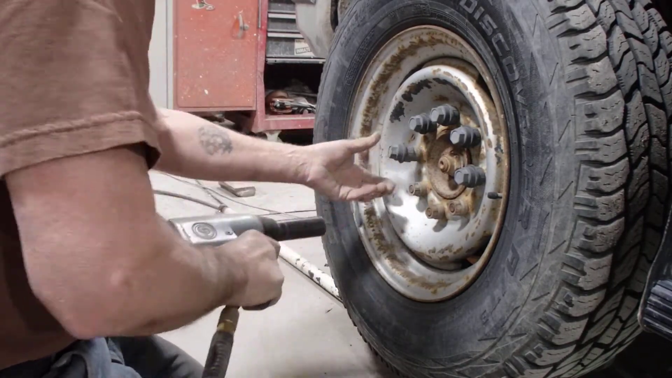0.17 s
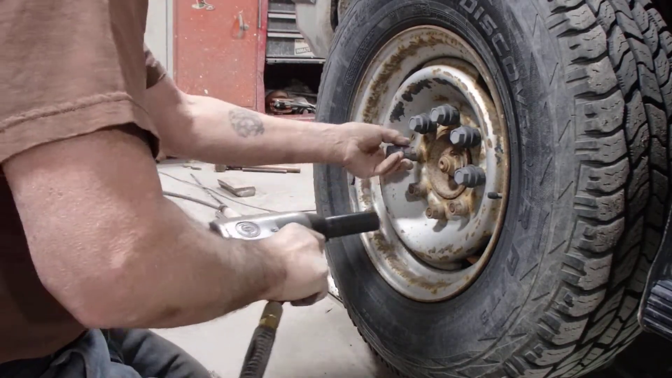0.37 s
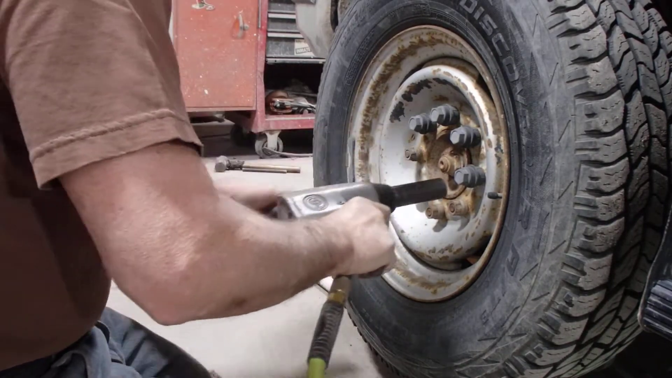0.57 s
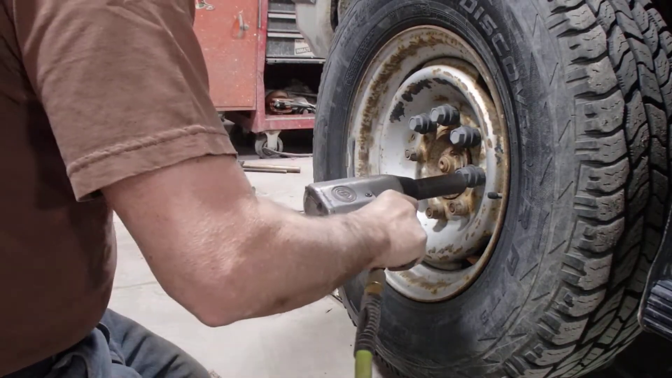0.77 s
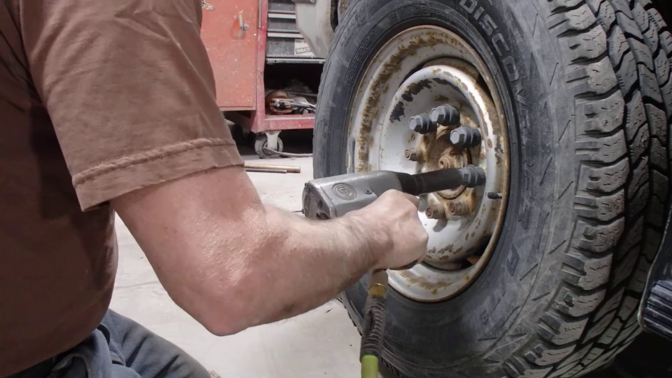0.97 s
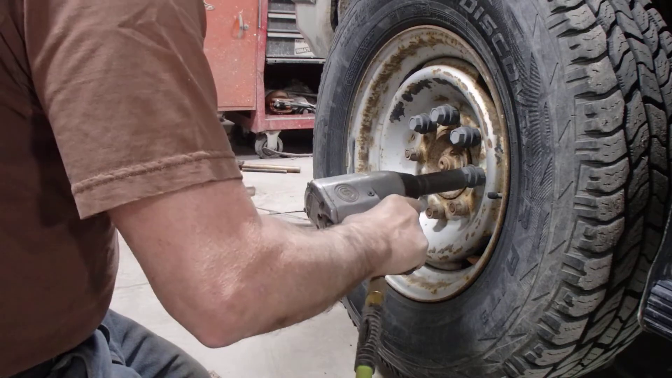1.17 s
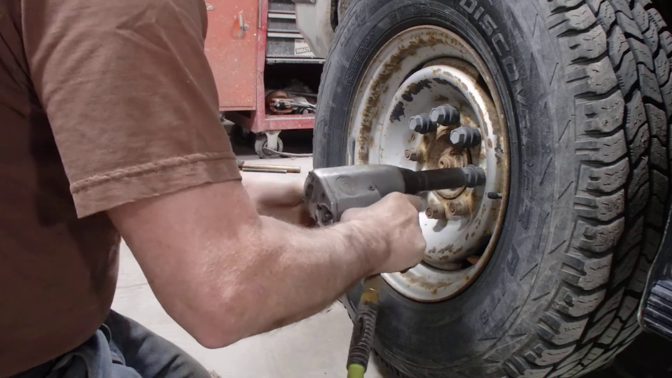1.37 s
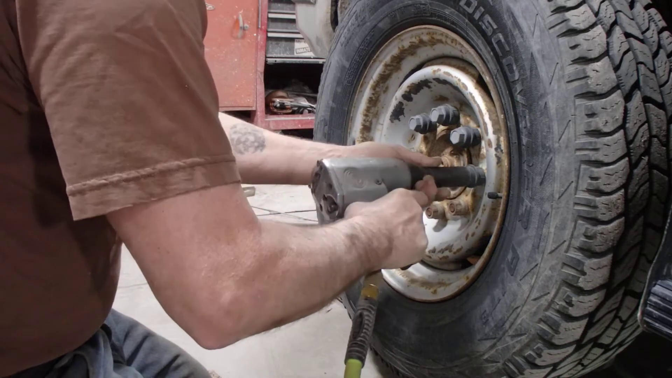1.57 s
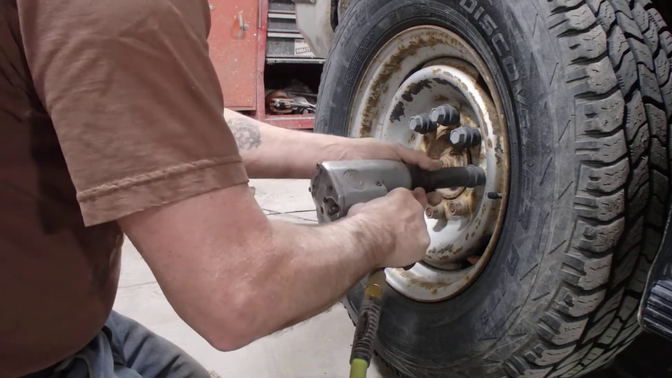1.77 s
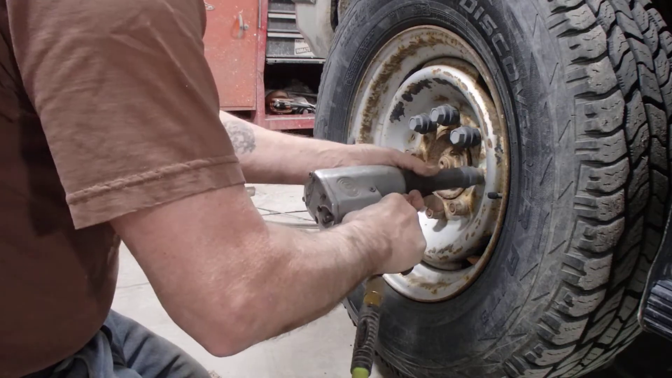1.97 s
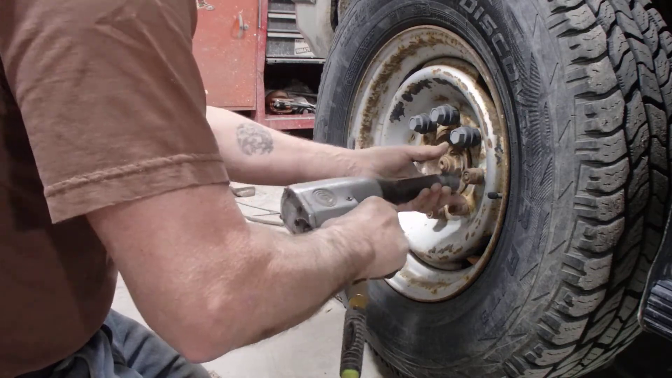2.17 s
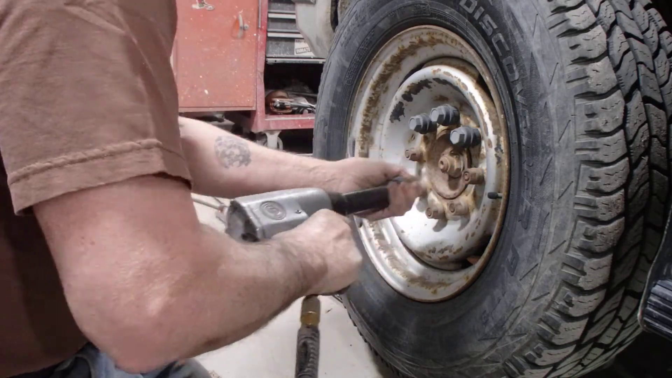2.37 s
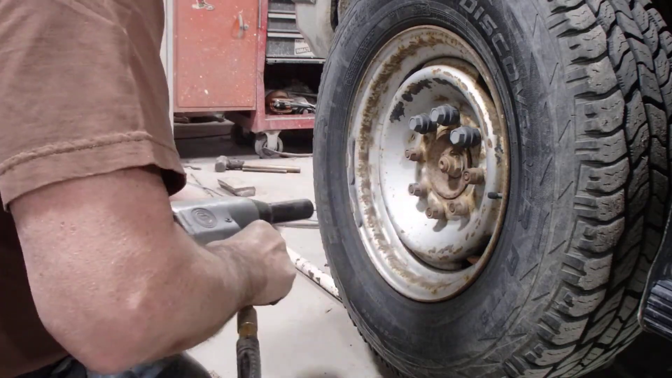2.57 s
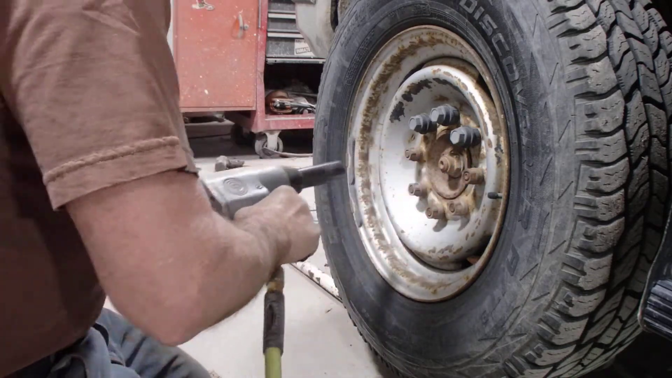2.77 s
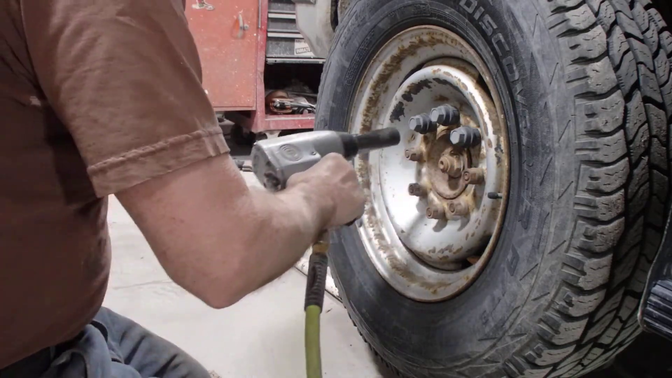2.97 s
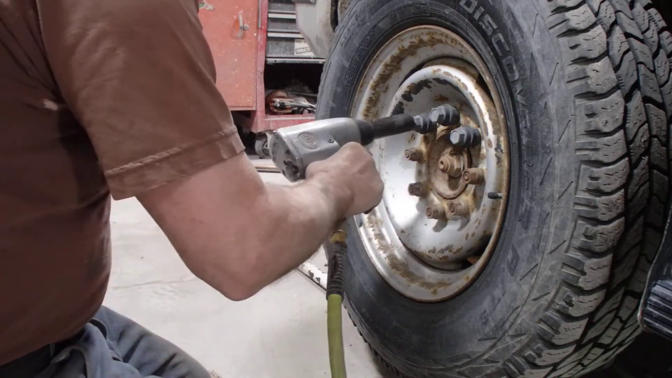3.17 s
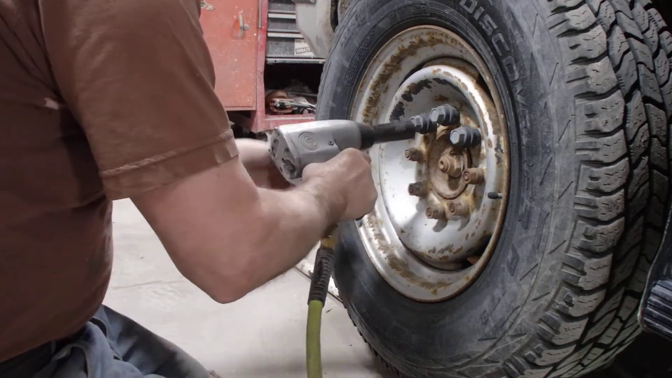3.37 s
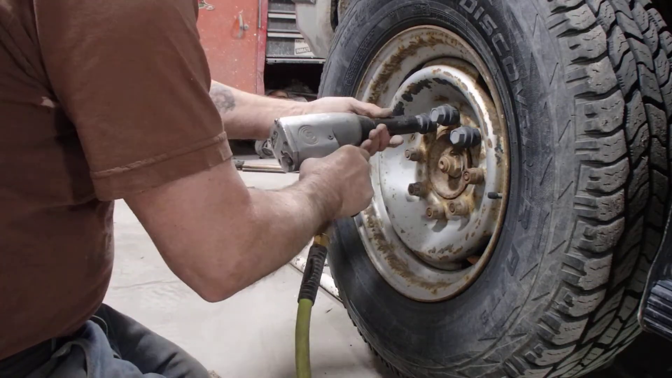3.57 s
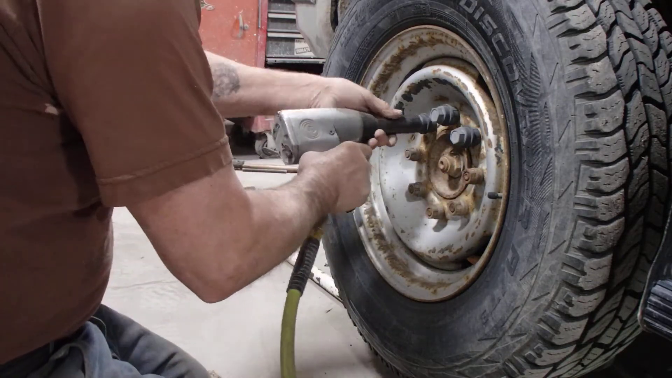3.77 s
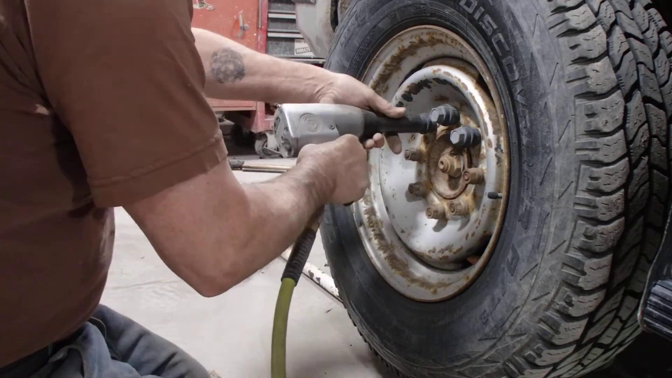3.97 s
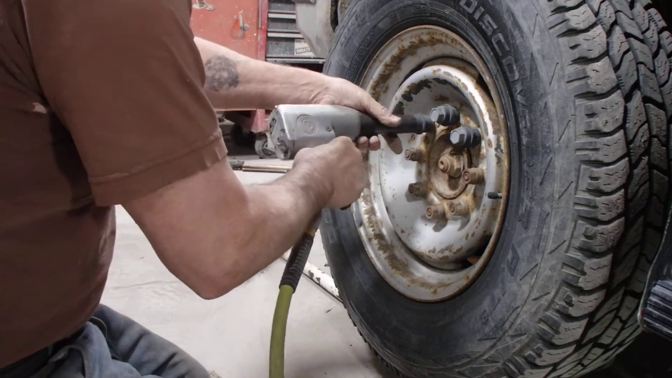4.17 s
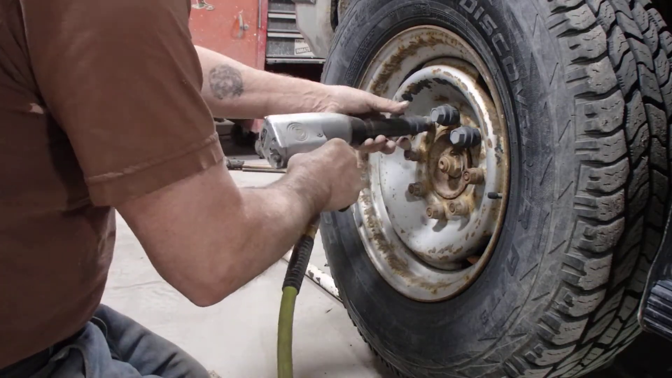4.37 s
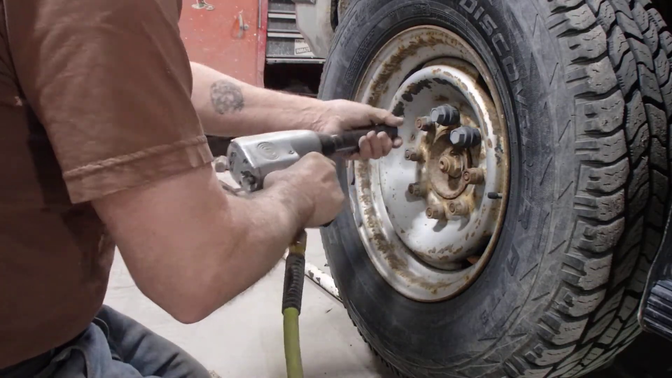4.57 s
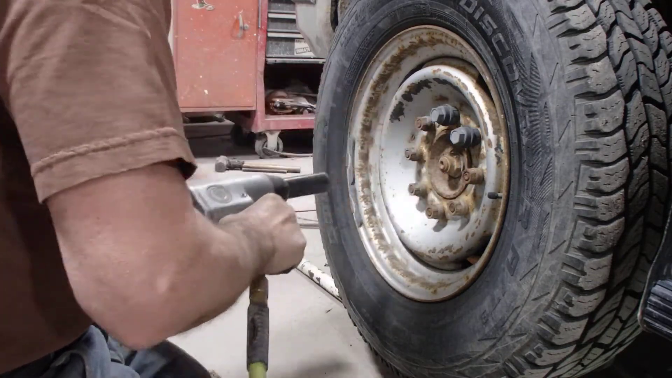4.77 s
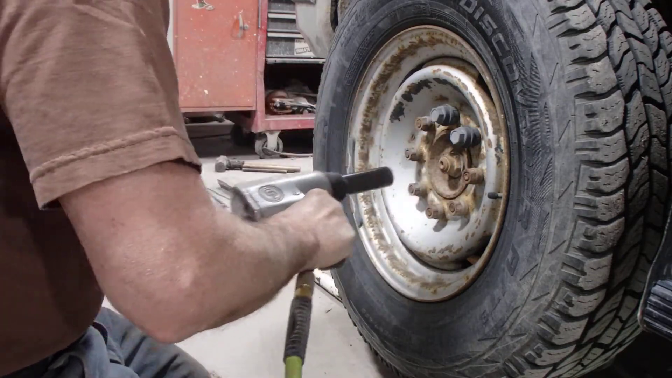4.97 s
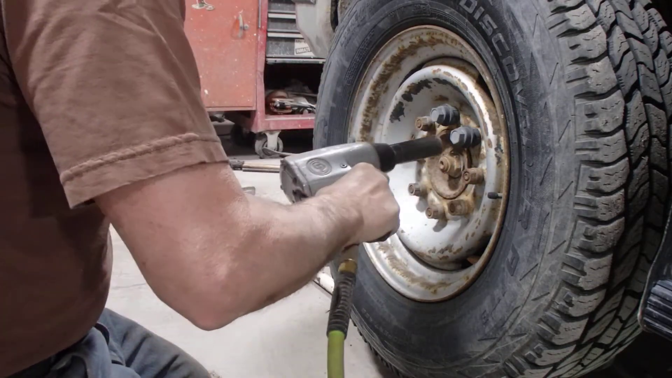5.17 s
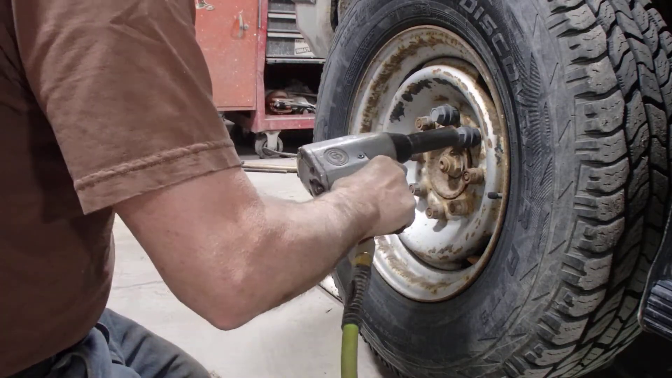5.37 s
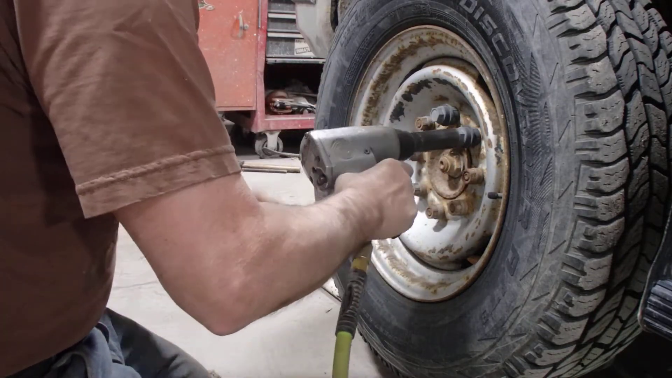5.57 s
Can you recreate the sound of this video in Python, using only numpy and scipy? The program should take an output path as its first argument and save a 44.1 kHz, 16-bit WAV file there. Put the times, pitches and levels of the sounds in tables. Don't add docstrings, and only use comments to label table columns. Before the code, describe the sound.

An air impact wrench fires two short hammering bursts in a garage, with metallic socket clinks and rattles between them.

```python
import sys
import numpy as np
from scipy import signal
from scipy.fft import rfft, irfft
from scipy.io import wavfile
from scipy.ndimage import map_coordinates

SR = 44100
rng = np.random.default_rng(int(sys.argv[2]) if len(sys.argv) > 2 else 0)


def materialize(psi):
    bounded = np.clip(np.atleast_2d(psi).T, -1, 1)
    quanta = np.round(bounded * 32767).astype(np.int16)
    wavfile.write(sys.argv[1], SR, quanta)


def ratio_of_db(decibels):
    return 10 ** (np.asarray(decibels, float) / 20)


N = 247401

# frequency in Hz, level in dB.
SHOP_SPECTRUM = [(25, -22), (60, -13), (100, 2), (250, -1), (365, 5.5), (480, -0.5), (1000, -3), (2000, -9),
                 (4000, -10), (8000, -19.5), (16000, -22.5)]
# duck in seconds, start of recovery in seconds, ducked gain in dB.
GAIN_DUCKS = [
    (-.5, .45, -20),
    (1.95, 2.55, -20.5),
    (4.17, 4.85, -24),
]
# low edge in Hz, high edge in Hz, level in dB, decay by 60 dB in seconds.
OLD_ECHO = [
    (110, 2200, -48, .7),
    (5600, 12000, -40, .45),
]
# low edge in Hz, high edge in Hz, decay by 60 dB in seconds, level in dB.
ROOM_BANDS = [
    (196, 1150, .9, -6.5),
    (1150, 2500, 0.68, -2),
    (2800, 5600, 0.61, -2.5),
    (6030, 20900, .42, -1.5),
]
# time in seconds, level in dB.
LEAK_LEVEL = [(.62, -91), (.68, -83), (.95, -85), (1.0, -95)]
# start in seconds, peak in dB, pitch in Hz.
LOOSE_TICKS = [(0.5594, -56.5, 6870), (0.9138, -55, 8580), (0.9494, -58, 7330), (1.4494, -53.5, 8270),
               (1.4694, -55.5, 8310), (2.7594, -61.5, 10040), (5.1894, -70.5, 9570)]
# start in
# seconds, peak in dB, tube ring in Hz, ring level in dB relative to the hit, treble level in dB relative to the
CLINKS = [(1.258, -17, 1830, -6, -18.5), (1.2806, -14, 1850, -10.5, -21), (1.296, -19, 1900, -12, -20),
          (1.6416, -21.5, 2402, -24, -21), (1.6894, -38.5, 1820, -10.5, -21.5),
          (1.728, -42.5, 2037, -16, -23.5), (3.27, -17, 2300, -1, -23), (3.286, -32, 2250, -2, -12),
          (3.3893, -26.5, 2494, -11.5, -24), (3.4114, -38, 2230, 0, -21.5),
          (3.4377, -26.5, 1828, -5.5, -20.5), (3.5558, -32, 2175, 5, -14), (3.6099, -23.5, 2243, -6.5, -37),
          (3.6428, -44.5, 2180, 3, -11), (3.6703, -22, 2500, -21.5, -21.5), (3.688, -37, 2063, -6, -9.5),
          (3.7065, -32.5, 2100, -14.5, -24.5), (3.7855, -12, 2160, -7.5, -23.5),
          (3.8644, -29, 2218, -3.5, -18.5), (3.909, -21.5, 2185, -6.5, -26),
          (3.9455, -38, 2200, -12.5, -3.5), (3.9982, -29, 1905, -8, -31.5), (5.4715, -25, 1900, 1, -14),
          (5.5733, -39, 2097, 9, -15)]
# frequency in Hz, relative half width, level in dB, fall in seconds.
SOCKET_WALL = [
    (6880, 0.065, -5, .005),
    (10600, 0.065, 2.5, .005),
]
# start in seconds, peak in dB, treble level in dB relative to the peak.
BLOWS = [(0.051, -32, -10.5), (0.1583, -43, -18), (1.9521, -2.5, -21.5), (1.9872, -0.5, -23),
         (2.0273, -2.5, -17), (2.0708, -3, -14.5), (2.1109, -8.5, -18), (2.156, -6.5, -14.5),
         (2.2129, -1.5, -17.5), (2.2972, -11.5, -21), (2.4085, -21.5, -11), (2.4738, -32, -10.5),
         (2.5884, -42, -22), (4.1994, -0.5, -18.5), (4.2346, -4, -14.5), (4.276, -1, -20.5),
         (4.3192, -9, -17), (4.3514, -12.5, -20.5), (4.3991, -9, -19.5), (4.4531, -7, -20),
         (4.5119, -6, -22), (4.6054, -23, -13), (4.6983, -26, -13), (4.7571, -37.5, -7.5)]
# start in seconds, rise in seconds, length in seconds, level in dB, spurts per second.
VALVE_BLASTS = [
    (1.91, 0.0081, 0.047, -5, 300),
    (4.158, 0.013, 0.017, -5, 500),
    (4.174, 0.0093, .023, -2.5, 600),
]
# frequency in Hz, level in dB.
JET_SPECTRUM = [(60, -33.5), (200, -15), (400, -21), (1000, -24.5), (2500, -12.5), (3500, -6), (4600, -5),
                (5800, -5.5), (9600, -6.5), (12000, -14), (16000, -20)]
# stall in seconds, exhaust in dB with the trigger held, exhaust in dB coasting, whine in dB.
BURSTS = [
    (-.02, -25, -39, -44),
    (2.48, -22, -45, -36),
    (4.64, -32, -44, -41),
]
# pressed in seconds, released in seconds.
TRIGGER = [
    (-.5, -.2),
    (1.912, 2.225),
    (4.16, 4.5),
]
# time in seconds, vane rate in Hz.
VANE_RATE = [
    [(-.3, 480), (-.2, 480)],
    [(1.92, 192), (2.0, 276), (2.046, 346), (2.108, 375), (2.15, 400), (2.208, 542), (2.235, 481),
     (2.274, 387)],
    [(4.17, 190), (4.268, 321), (4.32, 352), (4.358, 364), (4.444, 517), (4.488, 497), (4.524, 398),
     (4.576, 344)],
]
# multiple of the vane rate, level in dB.
WHINE_HARMONICS = [(1, 3), (2, 0), (3, 1), (4, -3), (5, -5), (6, -7.5), (7, -3)]
# frequency in Hz, level in dB.
EXHAUST_SPECTRUM = [(100, -35.5), (250, -20.5), (400, -14.5), (1000, -8.5), (1500, -8), (2000, -5),
                    (4000, 3), (8000, 0), (16000, -7.5)]
# frequency in Hz, gain in dB.
MUFFLER = [(100, -8.5), (290, -9), (370, 2.5), (480, -5.5), (800, 3), (1100, 0), (1500, 6.5), (2000, -1),
           (4000, -8)]
# frequency in Hz, gain in dB.
PORT_BASS = [(20, -12.5), (100, -1.5), (365, 5), (600, -0.5), (2000, 1.5), (3900, 6.5), (4600, 4)]
PORT_LEFT = [(5150, -13), (5700, 2), (8000, -7), (9700, 0.5), (11500, -14), (15500, -24)]
PORT_RIGHT = [(5200, -7), (5900, -19), (6800, -13), (8800, -21.5), (10000, -18), (13000, -12), (15500, -21)]
# frequency in Hz, lead of the right port in radians.
PORT_PHASE = [(8500, 0), (10500, 2.5), (14000, 3), (15500, -2)]
# frequency in Hz, level in dB.
SELF_NOISE = [(20, 1.5), (50, 9), (90, 5.5), (150, 4), (500, -3), (16000, 2)]


def curve(table, x):
    return np.interp(x, *np.transpose(table))


def colour(x, table):
    hz, db = np.transpose(table)
    grid_hz = np.linspace(1, SR / 2, 2049)
    gain_db = np.interp(np.log(grid_hz), np.log(hz), db)
    cepstrum = irfft(np.log(ratio_of_db(gain_db)))
    cepstrum[1:2048] *= 2
    cepstrum[2049:] = 0
    impulse = irfft(np.exp(rfft(cepstrum)))
    return signal.fftconvolve(x, impulse)[:len(x)]


def band(x, lo_hz, hi_hz):
    edges = [lo_hz, min(hi_hz, .45 * SR)]
    return signal.sosfilt(signal.butter(2, edges, "band", fs=SR, output="sos"), x)


def unit(x):
    return x / np.sqrt(np.mean(x ** 2))


def noise():
    return rng.standard_normal(N)


def walk(rate):
    levels = rng.standard_normal(N // 30)
    return unit(map_coordinates(levels, [np.arange(N) * rate / SR], order=3))


def add(out, s, x):
    i = int(s * SR)
    out[i:i + len(x)] += x[:N - i]


def crack(t, lo_hz, hi_hz, rise, fall):
    envelope = (1 - np.exp(-t / rise)) * np.exp(-t / fall)
    x = band(rng.standard_normal(len(t)) * envelope, lo_hz, hi_hz)
    return x / np.abs(x).max()


def ring(t, hz, t60):
    return np.sin(2 * np.pi * hz * t) * 1000 ** (-t / t60)


def shop():
    hum = unit(colour(noise(), SHOP_SPECTRUM))
    bass = band(hum, 15, 730)
    swelling_bass = ratio_of_db(2.0 * walk(5.5)) * bass
    swelling_rest = ratio_of_db(.8 * walk(3.3)) * (hum - bass)
    return ratio_of_db(-44) * (swelling_bass + swelling_rest)


def phone_gain():
    t = np.arange(N) / SR
    duck_db_per_s, recover_db_per_s = 120, 13
    gains_db = []
    for duck, recover, ducked_db in GAIN_DUCKS:
        before = np.maximum(duck_db_per_s * (duck + .15 - t), 0)
        after = np.maximum(recover_db_per_s * (t - recover), 0)
        gains_db.append(ducked_db + before + after)
    return ratio_of_db(np.min(gains_db, axis=0))


def old_echo():
    t, out = np.arange(N) / SR, np.zeros(N)
    for lo, hi, db, t60 in OLD_ECHO:
        out += ratio_of_db(db) * unit(band(noise(), lo, hi)) * 1000 ** (-t / t60)
    return out


def garage(x):
    t, tail = np.arange(SR) / SR, np.zeros(SR)
    for lo, hi, t60, db in ROOM_BANDS:
        tail += ratio_of_db(db) * band(rng.standard_normal(SR), lo, hi) * 1000 ** (-t / t60)
    tail *= np.clip(t / 0.01, 0, 1)
    tail *= ratio_of_db(-4.5) / np.sqrt(np.sum(tail ** 2))
    slap_s, slap_db = 0.016, -9.5
    add(tail, slap_s, ratio_of_db(slap_db) * rng.standard_normal(40) / 6)
    return signal.fftconvolve(x, tail)[:N]


def hose_leak():
    t = np.arange(N) / SR
    on = (t > LEAK_LEVEL[0][0]) * (t < LEAK_LEVEL[-1][0])
    hz = 7300 + 40 * walk(30)
    return ratio_of_db(12 + curve(LEAK_LEVEL, t)) * on * np.sin(2 * np.pi * np.cumsum(hz) / SR)


def loose_parts():
    t, out = np.arange(SR // 4) / SR, np.zeros(N)
    for s, db, hz in LOOSE_TICKS:
        add(out, s, ratio_of_db(db + 9) * crack(t, 0.63 * hz, 1.8 * hz, .0005, 0.004))
    return out


def socket():
    t, out = np.arange(SR // 4) / SR, np.zeros(N)
    for s, db, hz, ring_db, treble_db in CLINKS:
        tube = crack(t, 0.9 * hz, 1.13 * hz, 0.00037, .011)
        tube += .12 * band(ring(t, hz, .07), .7 * hz, 2.7 * hz)
        tube += 0.8 * crack(t, .75 * hz, 1.6 * hz, .0003, .004)
        wall = 1.3 * crack(t, 5500, 17000, .0001, .0015)
        for wall_hz, width, wall_db, fall in SOCKET_WALL:
            wall += ratio_of_db(wall_db) * crack(t, wall_hz * (1 - width), wall_hz * (1 + width), 0.00022, fall)
        contact = crack(t, 1.2 * hz, 5200, 0.00022, .0012)
        contact += .7 * crack(t, 1.1 * hz, 4500, .001, 0.007)
        knock_db = -38 - .6 * ring_db - .6 * db
        knock = ratio_of_db(knock_db + 2) * crack(t, 550, 1700, .001, 0.018)
        hit = contact + ratio_of_db(ring_db + 4.5) * tube + ratio_of_db(treble_db + 13.5) * wall + knock
        add(out, s - .0005, ratio_of_db(db - 3.5) * hit)
    return out


def hammer():
    t, out = np.arange(SR // 10) / SR, np.zeros(N)
    for s, db, treble_db in BLOWS:
        wheel_db = -17.5 - .35 * max(db, -20)
        blow = np.tanh(1.36 * crack(t, 2700, 5600, .0008, .003))
        blow += ratio_of_db(wheel_db + 6.5) * crack(t, 1356, 2500, 0.00018, 0.0078)
        blow += ratio_of_db(treble_db + 14.5) * crack(t, 4400, 7500, 0.00043, 0.0056)
        blow += ratio_of_db(treble_db + 22.5) * crack(t, 6800, 18000, 0.0002, .002)
        blow += ratio_of_db(-32.5) * crack(t, 180, 1200, 0.0011, 0.0048)
        add(out, s - .0005, ratio_of_db(db - 1.5) * blow)
    return out


def valve_blasts():
    t, out = np.arange(N) / SR, np.zeros(N)
    jet = unit(colour(noise(), JET_SPECTRUM))
    for s, rise, length, db, spurts in VALVE_BLASTS:
        opening = np.clip((t - s) / rise, 0, 1) ** 2
        closing = np.clip((s + length - t) / 0.0013, 0, 1)
        out += opening * closing * ratio_of_db(db - 6 + 3.0 * walk(spurts)) * jet
    return out


def vane_whine(turn, slow, held, flutter):
    bite_db, upper_db_per_octave = 8, 6
    upper_db = bite_db * (held - .6) + upper_db_per_octave * slow
    out = np.zeros(N)
    for (k, db), own in zip(WHINE_HARMONICS, flutter):
        out += ratio_of_db(db + (k > 2) * upper_db) * own * np.sin(k * turn + k * k)
    return out


def motor():
    t, exhaust, tone = np.arange(N) / SR, np.zeros(N), np.zeros(N)
    air = unit(band(colour(noise(), EXHAUST_SPECTRUM), 260, 19000)) * ratio_of_db(1.5 * walk(250))
    high = band(air, 3500, 18000)
    wobble = 1 + .017 * walk(60)
    flutter = [ratio_of_db(4.0 * walk(40)) for _ in WHINE_HARMONICS]
    held = sum(np.clip(np.minimum(t - a, b - t) / .015, 0, 1) for a, b in TRIGGER)
    idle_hz, coast_s = 70, .15
    vent_s, stall_db_per_s = .022, 130
    held_treble_db, coast_treble_db = 1.5, -8.5
    for spin, (_, release), (stall, held_db, coast_db, whine_db) in zip(VANE_RATE, TRIGGER, BURSTS):
        coast = np.exp(-np.maximum(t - spin[-1][0], 0) / coast_s)
        hz = idle_hz + (curve(spin, t) - idle_hz) * coast
        turn = 2 * np.pi * np.cumsum(hz * wobble) / SR
        on = np.clip((t - spin[0][0]) / 0.009, 0, 1)
        pressure = np.clip(1 - (t - release) / vent_s, 0, 1)
        fade_db = -stall_db_per_s * np.maximum(t - stall, 0)

        slow = np.minimum(np.log2(hz / 380), 0)
        tone_db = whine_db - 7 * pressure + 10 * slow + fade_db
        tone += on * ratio_of_db(tone_db - 2.5) * vane_whine(turn, slow, held, flutter)

        speed_db = 5 * np.log2(hz / 350)
        air_db = coast_db + pressure * (held_db - coast_db + speed_db) + fade_db
        treble_db = coast_treble_db + pressure * (held_treble_db - coast_treble_db)
        chop = 1 + .45 * np.cos(turn)
        exhaust += on * ratio_of_db(air_db + 0.5) * chop * (air + (ratio_of_db(treble_db) - 1) * high)
    return exhaust + colour(tone, MUFFLER)


def scene():
    steel = socket() + loose_parts() + hose_leak()
    wrench = band(motor() + valve_blasts() + hammer(), 90, 19000)
    sent = ratio_of_db(-4) * wrench + steel
    direct = wrench + steel
    return np.array([direct + garage(sent) + phone_gain() * shop() + old_echo() for _ in range(2)])


def roll_off(x):
    return signal.sosfilt(signal.butter(12, 15680, fs=SR, output="sos"), x)


def record(dry):
    hz = np.fft.rfftfreq(N, 1 / SR)
    left, right = rfft(dry)
    mono_hz = 4615
    right = left + (right - left) / (1 + (mono_hz / (hz + 1)) ** 3.6)
    right = irfft(right * np.exp(1j * curve(PORT_PHASE, hz)), N)
    ports = np.array([colour(dry[0], PORT_BASS + PORT_LEFT), colour(right, PORT_BASS + PORT_RIGHT)])
    self_noise = np.array([colour(noise(), SELF_NOISE) for _ in range(2)])
    hiss = ratio_of_db(-55.5) * phone_gain() * self_noise
    overload = 0.062 * np.array([[1], [.55]])
    ports += overload * np.minimum(ports ** 2, 1) ** 4
    ceiling = .97
    mix = np.clip(ports + hiss, -ceiling, ceiling)
    return roll_off(mix)


dry = scene()
out = record(dry)
materialize(out)
```